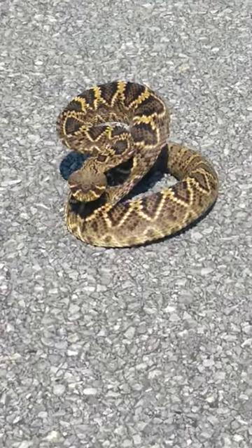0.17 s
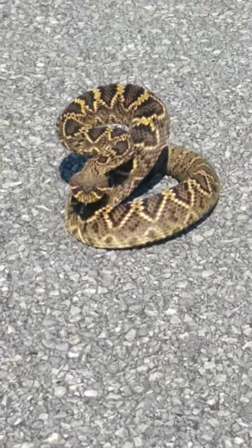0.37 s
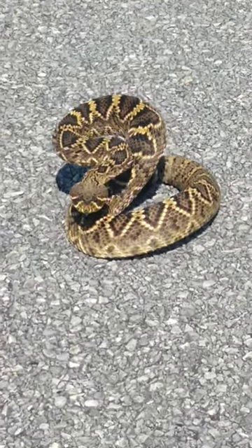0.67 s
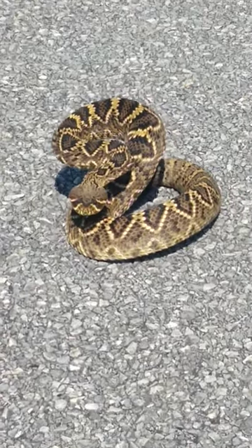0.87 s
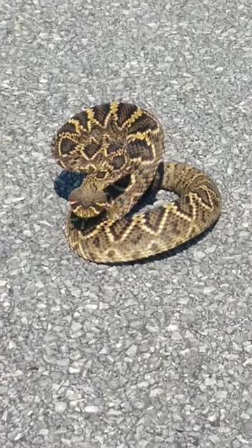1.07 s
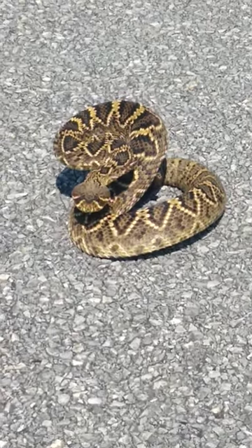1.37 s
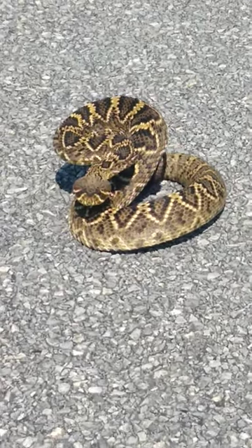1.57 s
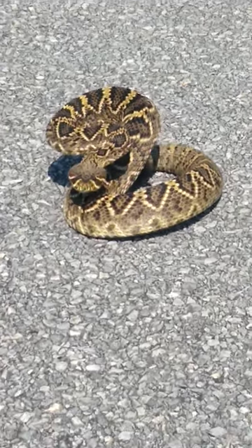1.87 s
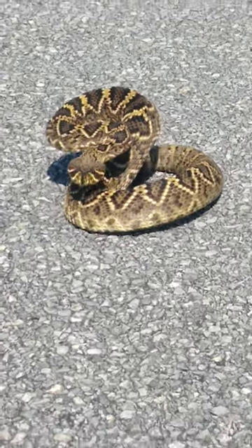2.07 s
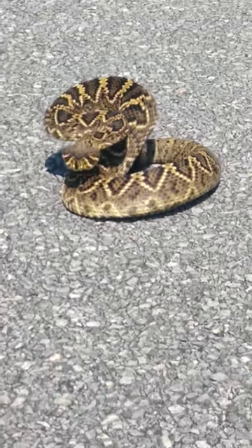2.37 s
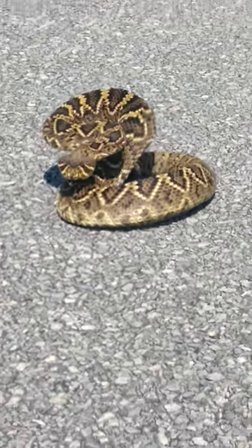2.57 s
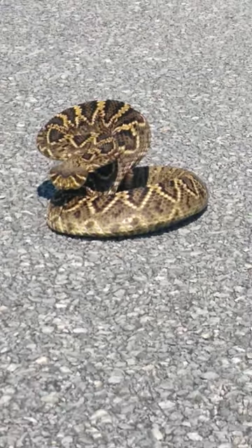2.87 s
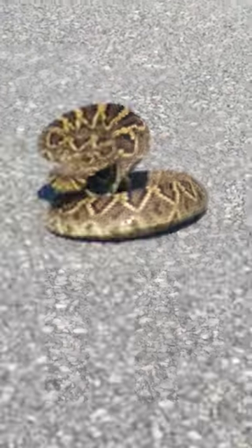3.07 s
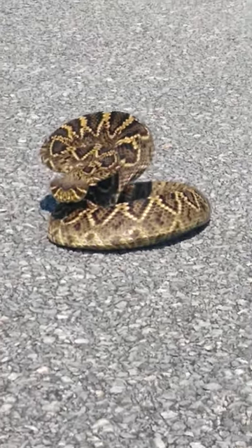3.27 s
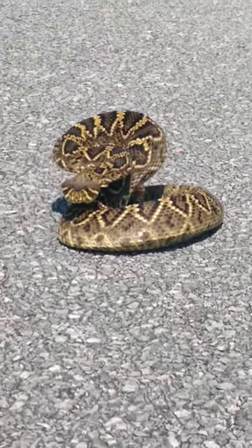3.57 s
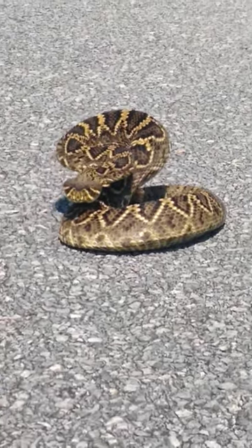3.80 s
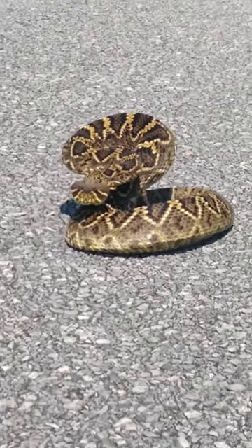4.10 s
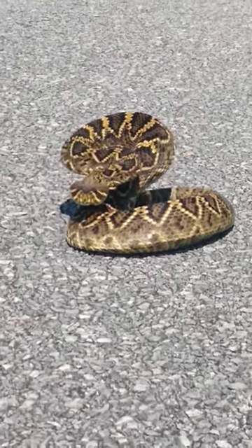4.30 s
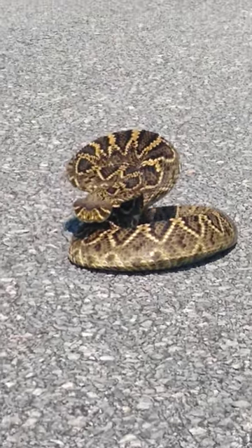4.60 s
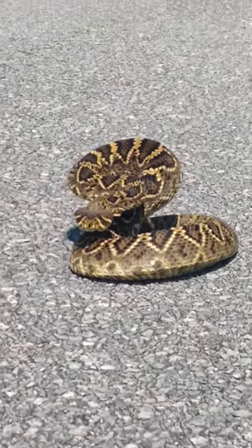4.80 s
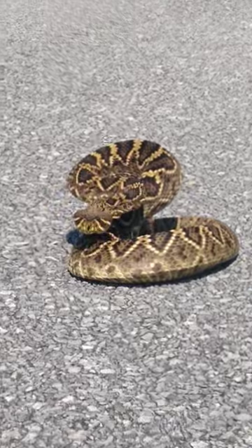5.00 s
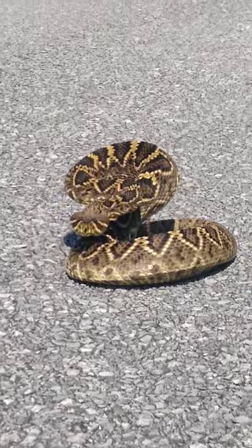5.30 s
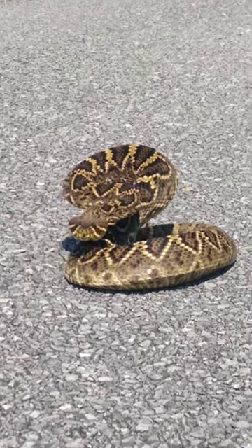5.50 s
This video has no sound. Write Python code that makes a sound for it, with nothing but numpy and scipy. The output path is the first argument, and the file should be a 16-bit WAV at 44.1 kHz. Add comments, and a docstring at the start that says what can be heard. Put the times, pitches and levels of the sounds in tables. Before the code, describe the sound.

Stuttering faint rattles of a snake's tail grow into a fast, bright, sustained buzz outdoors, over faint traffic, broken once by a hard click.

```python
"""A rattlesnake's tail buzzes in halting jerks, then in a fast, more even rattle, over far traffic and insects.
Fingers tap the camera body, and later something on it snaps once. The rattle is noise made louder and softer
by jerks, swings and tiny slaps; traffic and insects are filtered noise, the traffic with a fuzzy hum.
Taps are short sagging tones over a low sway; the snap is a brief crack and a set of dying tones.
The snake lies coiled on asphalt close to a hand-held camera with a left and a right microphone port."""
import sys
import numpy as np
from scipy import signal
from scipy.fft import rfft, irfft, next_fast_len
from scipy.io import wavfile
from scipy.ndimage import uniform_filter1d, map_coordinates

SR = 44100
rng = np.random.default_rng(int(sys.argv[2]) if len(sys.argv) > 2 else 0)


def store_wav(level_fs):
    """Save 16-bit WAV to argv[1]."""
    pcm = np.round(np.clip(np.atleast_2d(level_fs), -1, 1) * 32767)
    wavfile.write(sys.argv[1], SR, pcm.T.astype(np.int16))


N = 249165  # length in samples


def amp(db):
    """Turn decibels into a gain."""
    return 10 ** (np.asarray(db) / 20)


def unit(x):
    """Scale a sound to an average (rms) strength of 1."""
    return x / np.sqrt(np.mean(x ** 2) + 1e-20)


def along(points, hz):
    """Read each column after the frequency, with straight lines drawn on a log frequency axis."""
    f, *columns = np.transpose(points)
    return np.array([np.interp(np.log(hz + 1), np.log(f + 1), c) for c in columns])


def curves(rows):
    """Read each column after the time as one value per sample."""
    times, *columns = np.transpose(rows)
    return [np.interp(np.arange(N) / SR, times, c) for c in columns]


def wobble(rate):
    """Draw a smooth random curve through 'rate' random points a second."""
    points = rng.standard_normal(int(N * rate / SR) + 4)
    return map_coordinates(points, [np.arange(N) * rate / SR])


def filtered(x, response):
    """Multiply the spectrum of x by a response that depends on frequency."""
    m = next_fast_len(N + SR // 2)
    return irfft(rfft(x, m) * response(np.fft.rfftfreq(m, 1 / SR)), m)[..., :N]


def spread(pair, ports):
    """Mix two unrelated signals into left and right with a given likeness and phase lead."""
    def blend(hz):
        angle = np.arccos(np.clip(along(ports, hz)[0], -1, 1)) / 2
        return np.array([np.cos(angle), np.sin(angle)])

    def lead(hz):
        return np.exp(1j * np.outer([1, -1], along(ports, hz)[1]) / 2)

    mid, side = filtered(pair, blend)
    return filtered(np.array([mid + side, mid - side]), lead)


# bouts of jerks while the shaking halts, one jerk a swing:
# (first jerk [s], last jerk [s], level [dB], growth per jerk [dB])
JERK_BOUTS = [(0.019, 0.104, -53.5, 1.5), (0.135, 0.163, -69, 2), (0.1985, 0.255, -59, 3),
              (0.283, 0.341, -47.5, -3.5), (0.373, 0.394, -49, -3), (0.429, 0.488, -56, 4),
              (0.529, 0.564, -53, 2.5), (0.622, 0.683, -54.5, 1.5), (0.743, 0.801, -52.5, .2),
              (0.83, 0.876, -52, 0), (0.933, 0.956, -53, 3.5), (0.985, 1.075, -59.5, 2.5),
              (1.105, 1.137, -73, -3), (1.157, 1.185, -56.5, -2), (1.216, 1.309, -58.5, -2),
              (1.332, 1.37, -58.5, -7), (1.397, 1.482, -66, -3), (1.519, 1.571, -59, 2.5),
              (1.636, 1.748, -57.5, 1.5), (1.784, 1.832, -58, 2), (1.862, 1.895, -48.5, -3),
              (1.916, 2.033, -59, 2)]
JERK_ATTACK_S, JERK_HOLD_S = 0.0038, 0.01
RETURN_S, RETURN_DB = 0.0099, -8  # the swing back strikes again, weaker
JERK_SCATTER_DB, JERK_SCATTER_S, RETURN_SCATTER_DB = 1.2, 0.0005, 2.5


def jerks(rate, pause_s=0.0035, pause_db=-6):
    """Loudness of single jerks (sudden start, short hold, quick end) and the stillness just before each."""
    shape, still = np.zeros(N + SR), np.zeros(N)
    t = np.arange(SR // 10) / SR
    pulse = (1 - np.exp(-(t / JERK_ATTACK_S) ** 2)) * np.exp(-(t / JERK_HOLD_S) ** 3)
    for first, last, db, growth_db in JERK_BOUTS:
        chance = np.clip(rng.standard_normal(size=(8, 3)), -2, 2)
        swings = round((last - first) * rate[round(first * SR)])
        for k, s in enumerate(np.linspace(first, last, swings + 1)):
            size = amp(db + growth_db * k + JERK_SCATTER_DB * chance[k, 1])
            s = s + JERK_SCATTER_S * chance[k, 0]
            shape[round(s * SR):][:len(t)] += size * pulse
            return_size = size * amp(RETURN_DB + RETURN_SCATTER_DB * chance[k, 2])
            shape[round((s + RETURN_S) * SR):][:len(t)] += return_size * pulse
            still[round((s - pause_s) * SR):round(s * SR)] = pause_db
    return shape[:N], amp(uniform_filter1d(still, size=160))


def slaps(per_second, life_s=0.00031):
    """Loudness of slaps at random moments, each swelling and dying within a millisecond or so."""
    hits = (rng.random(N) < per_second / SR) * 1.0
    # running the decay forwards and backwards makes each slap swell as well as die
    return unit(signal.filtfilt([1], [1, -np.exp(-1 / (life_s * SR))], hits))


# effort of the tail, before the later gains: (time [s], level [dB])
TAIL_EFFORT = [(0, -50), (.28, -52.5), (.6, -57.5), (1.0, -60), (1.33, -63.5), (1.4, -86), (1.5, -67),
               (1.78, -62), (1.92, -46), (2.03, -44), (2.28, -40.5), (2.6, -41.5), (3.15, -39.5),
               (3.55, -39), (3.75, -37), (4.6, -38), (5.65, -36.5)]
# how fast the tail swings: (time [s], swings per second [Hz])
SWING_RATE = [(0, 34.5), (1.9, 35.5), (2.15, 40.4), (3.5, 40), (4.2, 39), (5, 39.3), (5.65, 38)]
# how steady the shaking is: (time [s], steadiness [0-1])
STEADINESS = [(0, 0.5), (1.0, .07), (1.85, 0), (2.1, 0.72), (3.75, 0.76), (5.65, 0.7)]
# how the coil is held, 0 hidden, 1 turning, 2 raised, 3 settled: (time [s], posture [0-3])
COIL_POSTURE = [(0, 0), (1.75, .1), (2.05, 1), (2.45, 1), (2.9, 2.5), (3.1, 2.5), (3.2, 2), (3.52, 2),
                (3.85, 3), (5.65, 3)]
# slaps bunch up inside a swing: (multiple of the swing rate [x], depth [nepers], place [turns])
SWING_BUNCHES = [(1, 0.095, 0.27), (2, 0.13, 0), (3, 0.17, 0.42), (4, 0.09, 0.071), (5, 0.061, 0.26)]
# the tail stalls for a moment: (time [s], depth [dB], length [s])
TAIL_STALLS = [(0.509, -7, 0.013), (.978, -14, 0.0096), (1.63, -3, .012), (1.911, -12, 0.01),
               (2.525, -2.5, .015), (2.713, -5.5, 0.01), (4.638, -3, 0.0064)]
# bands of large to small segments: (lowest frequency [Hz], highest frequency [Hz])
SEGMENT_BANDS = [(0, 4700), (4700, 8800), (8800, 11500), (11500, 22050)]
# the two ports, tail to the left, then ahead: (frequency [Hz], left-right likeness [0-1], left's lead [rad])
PORTS_TAIL_LEFT = [(1520, 0.84, 0.19), (3000, 0.61, 0.27), (5830, 0.62, 0.56), (9100, 1, 2.76),
                   (10000, 0.18, 1.6), (10900, 0.69, 2.1), (15500, 0.66, 3.2)]
PORTS_TAIL_AHEAD = [(1390, 0.89, 0.5), (5000, 0.95, 0), (5480, 0.88, 1.5), (7010, 0.15, -4), (7140, 1, 0),
                    (8300, 0.36, 0.62), (15500, 0.75, 0.6)]
# colour of the rattle with its echo off the ground, in each posture:
# (frequency [Hz], left level [dB], right level [dB])
COLOUR_HIDDEN = [(1750, -15, -14.5), (2360, -21.5, -17), (2520, -16.5, -18.5), (3000, -11.5, -8),
                 (4600, -8, -11.5), (4950, 4, -2.5), (5750, 3.5, 4), (6870, 0, -2), (7800, -1, 2.5),
                 (9000, -6, -20), (10460, -7, -15), (11900, 2.5, -9.0), (13300, 3, -5), (15400, 3.5, -13)]
COLOUR_TURNING = [(1860, -14, -14.5), (2440, -24, -21), (2490, -15.5, -16), (3100, -7, -5),
                  (4650, -10, -14.5), (5060, -9, -5), (5750, -0.5, -11), (6370, 2.5, 3.5), (7600, -2, -2.5),
                  (9800, -7, -12.5), (10900, -5.5, -18), (12800, 2, -9), (13600, 2.5, -7), (15400, 2.5, -9)]
COLOUR_RAISED = [(1240, -21.5, -19), (1770, -12.5, -14.5), (2320, -33, -27.5), (2450, -14.5, -12),
                 (3570, -4.5, -7), (4840, -9.5, -7.5), (5280, 4, 2), (5720, -14.5, -8.5), (6430, 2, -3),
                 (7900, -4, -12.5), (10550, -5, -13), (11260, -4.5, -28), (12850, 2.5, -3),
                 (13700, -2, -12), (15100, 2, -10)]
COLOUR_SETTLED = [(1300, -30.5, -27.5), (1685, -19.5, -20), (2190, -34, -31), (2310, -19.5, -18.5),
                  (3680, -9, -9.5), (4770, -13.5, -12), (4940, -4.5, -4.5), (5730, -9.5, -2.5),
                  (6400, -3, -12.5), (7160, -3, -9.5), (9950, -7, -15.5), (10730, -11, -24),
                  (12200, -3.5, -11), (14000, -4, -15), (14900, -3, -13)]


def rattle(own=0.67, hiss=0.98):
    """Dry hollow segments slap each other about a thousand times a second, bunched by the swing."""
    level_db, = curves(TAIL_EFFORT)
    rate, = curves(SWING_RATE)
    steady, = curves(STEADINESS)
    posture, = curves(COIL_POSTURE)

    # the swing count drifts a little, so the rhythm is not perfect
    turns = np.cumsum(rate) / SR + 0.026 * wobble(14)
    bunching = np.exp(sum(depth * np.cos(2 * np.pi * (k * turns - place))
                          for k, depth, place in SWING_BUNCHES))
    even = amp(-2.5) * bunching * amp(0.1 * wobble(70) + 0.06 * wobble(3.3))
    halting = amp(-5.5 + 0.9 * np.cos(2 * np.pi * turns) + 0.8 * wobble(55))
    jerk, still = jerks(rate)
    shaking = steady * even + (1 - steady) * halting
    drive = amp(level_db) * still * shaking + jerk
    t = np.arange(N) / SR
    stall_db = sum(db * np.exp(-((t - s) / length) ** 2) for s, db, length in TAIL_STALLS)
    drive = drive * amp(stall_db)

    # some slaps run through the whole chain, others stay among segments of one size
    chain = slaps(1300)
    noise = np.zeros((2, N))
    for low, high in SEGMENT_BANDS:
        loudness = drive * (chain + own * slaps(900) + hiss)
        noise += filtered(loudness * rng.standard_normal((2, N)), lambda hz: (hz >= low) & (hz < high))

    aside, ahead = spread(noise, PORTS_TAIL_LEFT), spread(noise, PORTS_TAIL_AHEAD)
    postures = [(COLOUR_HIDDEN, aside), (COLOUR_TURNING, aside),
                (COLOUR_RAISED, ahead), (COLOUR_SETTLED, ahead)]
    out = np.zeros((2, N))
    for place, (colour, pair) in enumerate(postures):
        share = np.clip(1 - np.abs(posture - place), 0, 1)  # neighbouring postures cross-fade
        # the last factor thins out the sound below about 900 Hz
        out += share * filtered(pair, lambda hz: amp(along(colour, hz)) * hz ** 2 / (hz ** 2 + 900 ** 2))
    return amp(2.5) * out


# swell of the far traffic, before a random wobble: (time [s], level [dB])
TRAFFIC_LEVEL = [(0, -67), (.85, -69), (1.4, -72.5), (2.0, -66), (2.95, -62), (3.6, -63), (4.6, -65),
                 (5.0, -64), (5.65, -64)]
# tone balance of the low rumble: (frequency [Hz], relative level [dB])
RUMBLE_COLOUR = [(15, -48), (30, -28), (48, 3), (91, 0.5), (113, -4), (145, -5.5), (220, -6.5),
                 (350, -13.5), (460, -51), (770, -120)]
# tone balance of the wash of air: (frequency [Hz], relative level [dB])
WASH_COLOUR = [(150, -39), (280, -4.5), (400, 0.5), (600, -3), (900, -2.5), (1500, -9.5), (3000, -9.5),
               (16000, -16)]
# traffic at the two ports: (frequency [Hz], left-right likeness [0-1], left's lead [rad])
TRAFFIC_PORTS = [(60, 0.82, 0.064), (141, 0.9, 0.057), (300, 0.75, 0.054), (990, 0.53, .1),
                 (4000, 0.73, 0.092)]
HUM_HZ, HUM_DB = 142.7, 5.5  # level on the scale of the rumble's tone balance
WASH_FOLLOWS = 0.98  # share of the rumble's swells that the wash takes up


def traffic():
    """A low rumble with a fuzzy engine hum, and a faint wash of air that swells with it."""
    rumble_db, = curves(TRAFFIC_LEVEL)
    mean_db = rumble_db.mean()
    wash_db = mean_db + WASH_FOLLOWS * (rumble_db - mean_db)

    def rumble_and_hum(hz):
        hum = amp(HUM_DB) / (1 + ((hz - HUM_HZ) / 5) ** 2)
        return amp(along(RUMBLE_COLOUR, hz)[0]) + hum

    rumble_noise = spread(rng.standard_normal((2, N)), TRAFFIC_PORTS)
    rumble = unit(filtered(rumble_noise, rumble_and_hum))
    wash_noise = spread(rng.standard_normal((2, N)), TRAFFIC_PORTS)
    wash = unit(filtered(wash_noise, lambda hz: amp(along(WASH_COLOUR, hz)[0])))
    return amp(rumble_db + wobble(3.9)) * rumble + amp(wash_db + wobble(5.83)) * wash


def insects(centre_hz=8100, width_hz=320, level_db=-74.5):
    """Far insects as a faint whir: noise in one high band, its level wavering slightly."""
    band = filtered(rng.standard_normal((2, N)), lambda hz: np.exp(-((hz - centre_hz) / width_hz) ** 2 / 2))
    return amp(level_db + 1.5 * wobble(11)) * unit(band)


# fingers on the camera body: (time [s], level [dB], left over right [dB], starting pitch [Hz])
FINGER_TAPS = [(1.0747, -53.5, -9, 450), (1.1954, -45, -7, 785), (1.4496, -44.5, -7, 790),
               (1.9173, -37.5, -15, 1070), (2.305, -44, 8, 1020), (2.44, -47.5, 3, 1030),
               (2.464, -51, 9, 1050), (3.23, -52.5, -14, 484)]


def taps(sag=0.22, body_hz=260, body_db=-16):
    """Each soft tap is about two cycles of the camera shell, sagging in pitch, over a low sway of the body."""
    out, t = np.zeros((2, N + SR)), np.arange(SR // 20) / SR
    sway = amp(body_db - 60 * t / 0.021) * np.sin(2 * np.pi * body_hz * t) * (1 - np.exp(-t / 0.0068))
    for s, db, pan_db, hz in FINGER_TAPS:
        cycles = hz * t
        swell = np.exp(-((cycles - 1.1) / 0.67) ** 2)
        thud = np.cos(2 * np.pi * np.log1p(sag * cycles) / sag) * swell
        sides = amp([[pan_db / 2], [-pan_db / 2]])
        out[:, round(s * SR):][:, :len(t)] += amp(db) * sides * (thud + sway)
    return out[:, :N]


# tones the snap rings with:
# (frequency [Hz], time to fall 60 dB [s], left relative level [dB], right relative level [dB])
SNAP_RINGS = [(410, 0.017, -23.5, -24), (547, 0.0155, -25, -22), (1060, 0.0059, -14, -29),
              (1250, .01, -22, -25), (1380, 0.012, -11, -8.5), (1590, 0.014, -35, -6.5),
              (1930, 0.013, -20, -4.5), (2470, 0.0082, -21, -18), (3370, 0.0063, -43, -1.5),
              (4260, 0.0046, -2.5, -9.5)]
SNAP_S, SNAP_DB = 3.5525, -7


def snap(crack_hz=[1750, 2150], crack_db=[-2, 2.4], width_s=0.00029):
    """One hard snap: a crack of about two cycles, while the plastic shell rings for a few milliseconds."""
    out, t = np.zeros((2, N)), np.arange(SR // 20) / SR
    # the right port is nearer: louder, brighter and a little earlier
    since = t - np.array([[0.00071], [0.00056]])
    burst = np.exp(-(since / width_s) ** 2 / 2)
    tone = np.sin(2 * np.pi * np.array(crack_hz)[:, None] * since)
    sound = amp(crack_db)[:, None] * burst * tone
    rise = 1 - np.exp(-(t / 0.0005) ** 2)
    for hz, t60, left_db, right_db in SNAP_RINGS:
        ring = amp(2.0 - 60 * t / t60) * rise * np.sin(2 * np.pi * hz * t)
        sound = sound + amp([[left_db], [right_db]]) * ring
    out[:, round(SNAP_S * SR):][:, :len(t)] = amp(SNAP_DB) * sound
    return out


def scene():
    """Add up all sources at the two microphone ports."""
    return rattle() + traffic() + insects() + taps() + snap()


def record(dry, top_hz=15950):
    """The camera rounds off the loudest peaks and keeps nothing above its band limit."""
    soft = dry / (1 + np.abs(dry / 0.98) ** 8) ** (1 / 8)
    return filtered(soft, lambda hz: hz < top_hz)


dry = scene()
out = record(dry)
store_wav(out)
```